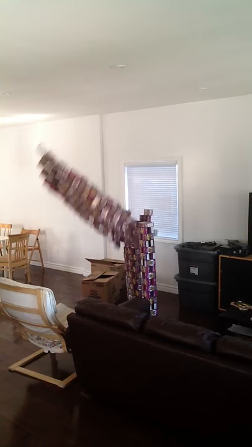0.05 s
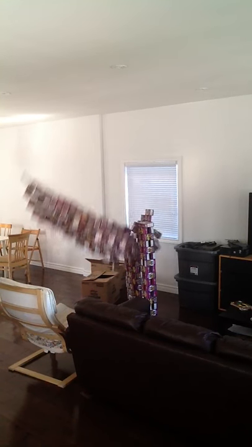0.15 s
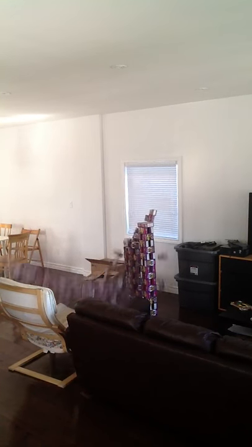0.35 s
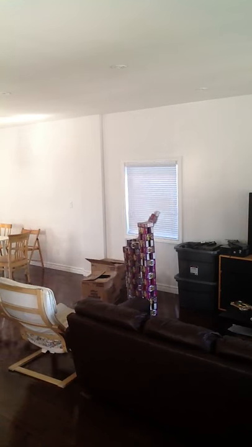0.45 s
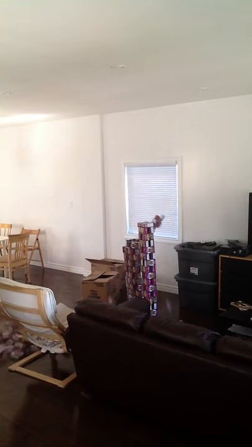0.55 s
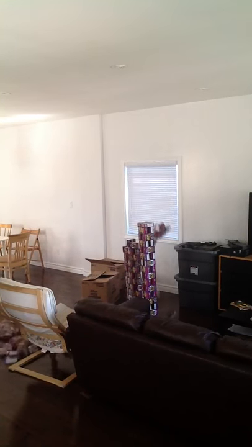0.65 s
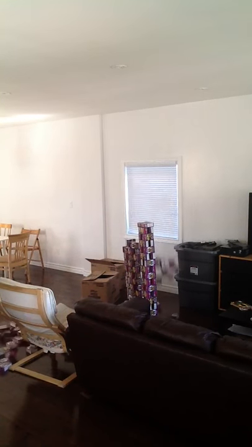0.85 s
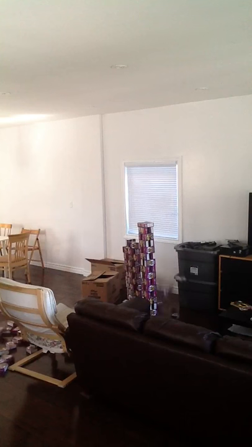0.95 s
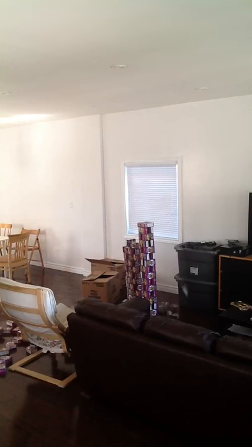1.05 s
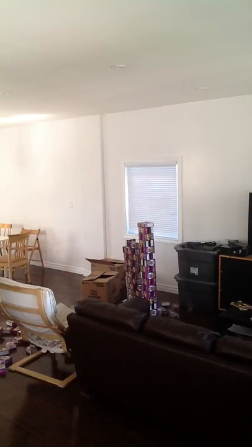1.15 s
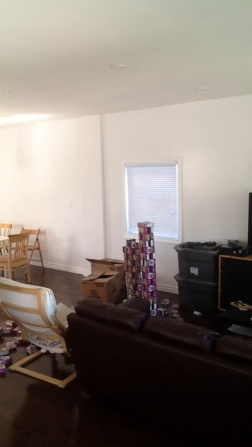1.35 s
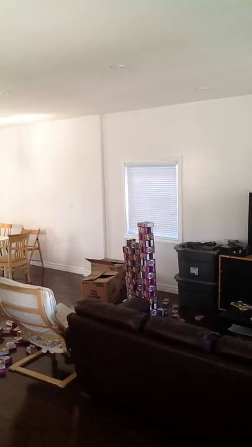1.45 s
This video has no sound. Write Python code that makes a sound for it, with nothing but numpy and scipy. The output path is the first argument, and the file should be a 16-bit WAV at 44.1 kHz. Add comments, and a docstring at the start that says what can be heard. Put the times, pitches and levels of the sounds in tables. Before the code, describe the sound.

Small cardboard boxes collapse in a bare living room, heard from a few metres off. They knock softly as the tower leans, hit the hard floor with sharp clicks and hollow knocks, and a few more tumble after.

```python
"""Living room, hard floor: a tall tower of small empty cardboard boxes, a few metres from a mono phone.
First the boxes slip and knock as the tower leans. At about 0.4 s the column crashes down and tumbles,
with corner clicks and faint floor thuds. Near 1 s a second batch drops and settles.
Each knock is a crack of card plus short panel tones, blurred by the bare room on its way to the mic."""
import sys
import numpy as np
from scipy import signal
from scipy.fft import rfft, irfft, next_fast_len
from scipy.io import wavfile

SR = 44100
rng = np.random.default_rng(int(sys.argv[2]) if len(sys.argv) > 2 else 0)


def unload_wav(signal):
    """Save mono or channel-first audio to the path in sys.argv[1] as 16-bit WAV at rate SR, clipped to [-1, 1]."""
    wavfile.write(
        sys.argv[1],
        SR,
        np.round(np.clip(np.atleast_2d(signal).T, -1, 1) * 32767).astype(np.int16),
    )


N = 66150
LEAD = 13230  # samples before time zero, so the boxes are already slipping at the start


def undb(db):
    """Decibels to gain."""
    return 10 ** (np.asarray(db) / 20)


def unit(x):
    """Scale to unit energy."""
    return x / np.sqrt(np.sum(x ** 2, axis=-1, keepdims=True) + 1e-18)


def fade(t, t60):
    """Exponential decay, 60 dB down after t60 seconds."""
    return np.exp(-np.log(1000) * t / t60)


def add(track, start_s, x):
    """Mix x in at start_s; the track begins LEAD samples before zero."""
    i = max(int(start_s * SR) + LEAD, 0)
    part = x[:max(len(track) - i, 0)]
    track[i:i + len(part)] += part


def colour(x, points):
    """Minimum-phase filter through (freq_hz, gain_db) points."""
    hz, db = np.array(points, float).T
    n = 2 * next_fast_len(x.shape[-1])
    bins_hz = np.arange(n // 2 + 1) * SR / n
    gain = undb(np.interp(np.log(bins_hz + 1), np.log(hz), db))
    cepstrum = irfft(np.log(gain))
    cepstrum[1:n // 2] *= 2
    cepstrum[n // 2 + 1:] = 0
    return irfft(rfft(x, n) * np.exp(rfft(cepstrum)))[..., :x.shape[-1]]


# Decay of the bare living room: band_hz, t60_s
ROOM_DECAY = [(150, 0.59), (500, 0.83), (1500, 0.79), (4000, 1), (8000, 0.81), (15000, 0.47)]
def room(x, wet_db=0, gap_s=0.0037, build_s=0.0031, early_span_s=.028, reflections=14, size=32768):
    """From one spot to the mic: direct sound, near reflections and a diffuse tail that dulls as it dies."""
    t, hz = np.arange(size) / SR, np.arange(size // 2 + 1) * SR / size
    bands_hz, t60s = np.array(ROOM_DECAY).T
    noise, tail = rfft(rng.standard_normal(size)), 0
    for band, t60_s in zip(np.eye(len(bands_hz)), t60s):
        band_gain = np.interp(np.log(hz + 1), np.log(bands_hz), band)
        tail = tail + irfft(noise * band_gain) * fade(t, t60_s)
    tail *= 1 - np.exp(-np.maximum(t - gap_s, 0) / build_s)
    early, strengths = np.zeros(size), rng.standard_normal(reflections)
    delays_s = gap_s + early_span_s * rng.random(reflections)
    early[(delays_s * SR).astype(int)] = strengths
    response = undb(wet_db) * (undb(3.5) * unit(tail) + undb(-2.5) * unit(early))
    response[0] += 1  # direct path
    return signal.fftconvolve(x, unit(response))[:len(x)]


# The floor under the heaviest blows: start_s, relative_level_db
FLOOR_THUDS = [(0.397, -39), (0.423, -39), (0.489, -39), (.54, -46), (.61, -49), (0.748, -42), (.987, -41),
               (1.075, -50), (1.161, -49)]
def floor_thuds(pitch_hz=86, t60_s=0.074, attack_s=.004, size=12000):
    """The floor gives a faint thump of three scattered low tones, heard across the room."""
    out, t = np.zeros(LEAD + N), np.arange(size) / SR
    envelope = fade(t, t60_s) * (1 - np.exp(-t / attack_s))
    for start_s, level_db in FLOOR_THUDS:
        tones_hz = pitch_hz * np.exp(0.28 * rng.standard_normal((3, 1)))
        thump = np.sin(2 * np.pi * tones_hz * t).sum(0)
        add(out, start_s, undb(level_db) * unit(thump * envelope))
    return room(out)


# Sharp corner strikes: start_s, relative_level_db
CORNER_SNAPS = [(0.401, -19), (0.429, -27), (0.466, -33), (0.99, -35)]
def corner_snaps(t60_s=0.0087, size=1024):
    """A stiff corner gives a short bright click that reaches the mic with less room on it."""
    out, t = np.zeros(LEAD + N), np.arange(size) / SR
    for start_s, level_db in CORNER_SNAPS:
        burst = rng.standard_normal(size) * fade(t, t60_s)
        click = colour(burst, [(500, -1), (2500, 5.5), (8500, 3), (14000, -15)])
        add(out, start_s, undb(level_db) * unit(click))
    return room(out, wet_db=-7)


# Panel modes of a typical box: pitch_hz, relative_level_db, t60_s
BOX_MODES = [(364.3, -9, 0.033), (485, -6, 0.072), (692.6, -1.5, 0.059), (933.7, 2, 0.05),
             (1299, 1.5, 0.036), (1607, -5.5, 0.087), (2156, -1, 0.02), (3090, -9.5, 0.0091)]
# Spectrum of the crack of card: freq_hz, gain_db
CRACK_SPECTRUM = [(40, -53), (80, -34), (130, -19), (190, -7), (330, -1.5), (1000, 2), (2400, 0.5),
                  (5000, -3), (8500, -8.5), (15000, -16)]
def knocks(count, size_spread=0.1585, crack_db=-1.5, crack_t60_s=0.015, size=2048):
    """Knocks of unit energy: a crack plus panel tones, pitched by the size of each box and weighted by where it
    is hit."""
    t = np.arange(size) / SR
    pitch_ratio = np.exp(size_spread * rng.standard_normal((count, 1)))
    panels = 0
    for pitch_hz, level_db, t60_s in BOX_MODES:
        detune, weight = rng.standard_normal((2, count, 1))
        tone = np.sin(2 * np.pi * pitch_hz * pitch_ratio * (1 + 0.054 * detune) * t)
        panels = panels + undb(level_db) * weight * unit(tone * fade(t, t60_s))
    crack = colour(rng.standard_normal((count, size)) * fade(t, crack_t60_s), CRACK_SPECTRUM)
    return unit(unit(panels) + undb(crack_db) * unit(crack))


def contact(x, bass_db, bite_db, treble_db):
    """Flat faces land with more bass, edges and corners with more bite and treble."""
    return colour(x, [(330, bass_db), (900, 0), (2800, bite_db), (11000, treble_db)])


# Runs of small knocks; a negative fade swells:
# start_s, length_s, level_db, fade_db, bass_db, bite_db, treble_db
KNOCK_SHOWERS = [(-.15, 0.26, -29, 11.5, 0.5, -5.5, -1), (0.073, 0.076, -33, 2, 8, -1.5, -2.5),
                 (0.17, 0.12, -26, 6, 1, -5.5, -3.5), (0.286, 0.098, -30.5, -15, 7, -2, -1.5),
                 (0.368, .028, -20.5, 1, 8, -6, -1), (.395, .033, -18.5, 4, 3.5, 8.5, 2.5),
                 (0.427, .05, -13, 1, -2.5, 2.5, 8), (.478, .095, -15.5, 8.5, -0.5, 0.5, 3.5),
                 (.57, .085, -21.5, 3, -6.5, -3, -5), (0.668, 0.16, -25.5, 7.5, 1.5, 0, 0),
                 (0.838, .1, -27, 3, 1.5, 1.5, -2), (.958, .03, -20.5, 12, -5, 2, 5),
                 (.987, 0.034, -20.5, 12, 2.5, 5, 3), (1.045, 0.062, -20.5, 24, 3, 0, -2),
                 (1.11, .15, -25.5, 12, -14, -7.5, -4), (1.269, .23, -43, 5, 2, -6, -2)]
def showers(count=36, spread_db=4.5, spot_count=9):
    """Boxes pile onto each other in uneven runs that mostly weaken; one track per spot on the floor."""
    spots = np.zeros((spot_count, LEAD + N))
    steps = np.tile(np.linspace(-2, 2, 6), (count // 6, 1))  # every six knocks span soft to hard
    for start_s, length_s, level_db, fade_db, *tone_db in KNOCK_SHOWERS:
        progress = (np.arange(count) + rng.random(count)) / count
        uneven_db = spread_db * rng.permuted(steps, axis=1).ravel()
        strength = undb(level_db) * np.sqrt(length_s * SR) * unit(undb(uneven_db - fade_db * progress))
        for k, knock in enumerate(contact(knocks(count), *tone_db)):
            add(spots[k % spot_count], start_s + progress[k] * length_s, strength[k] * knock)
    return spots


# Single boxes that stand out at the mic, each with a boom and a landing:
# start_s, relative_level_db, bass_db, bite_db, treble_db, boom_offset_db, boom_hz
BOX_LANDINGS = [(.002, -30, -11, -30, -3, -6.5, 239), (.076, -36, 6, -5, -10, 1.5, 247),
                (.170, -28.5, 7, -4, -16, 0, 367), (.191, -28, -1, 0.5, -13, -1.5, 282),
                (.26, -30, 1.5, -1, -3, -3, 243), (.3635, -20, -2.5, -5.5, -4, -2.5, 482.5),
                (.392, -22.5, -1, 3, -3, -2, 374), (.4235, -13, 3.5, -2, 3, -14, 325),
                (.436, -17.5, -17, 8.5, 3.5, -3, 354), (.499, -20.5, 5.5, 2.5, -7, -1, 325.6),
                (0.539, -18, 5, 5, 1, -15, 320), (.562, -15, 3, -0.5, 0, -14, 243),
                (0.603, -15.5, -17, -3, -2.5, -20, 250), (.751, -25.5, 7.5, 7, -8, -25, 245),
                (.786, -21.5, -6, -2, 1, -18.5, 227), (.905, -28, 8, -3, -3, -1.5, 245.3),
                (.987, -20, 7, -5.5, 3, -7, 244.7), (1.078, -19, 1, 1, -4, -7.5, 239.7),
                (1.161, -25, -14, -2.5, -14, -10, 252), (1.235, -33, 3.5, 0.5, -5, -12, 248),
                (1.325, -34.5, 0, -11, -3, -11.5, 242), (1.378, -41, -2, 3.5, 1, -2.5, 253)]
def hollow_booms(t60_s=0.29, attack_s=0.0042, size=15000):
    """The air inside a landing box swells into a short hollow note."""
    out, t = np.zeros(LEAD + N), np.arange(size) / SR
    envelope = fade(t, t60_s) * (1 - np.exp(-t / attack_s))
    for start_s, level_db, *_, boom_offset_db, boom_hz in BOX_LANDINGS:
        boom = np.sin(2 * np.pi * boom_hz * t) * envelope
        add(out, start_s, undb(level_db + boom_offset_db) * unit(boom))
    return out


def landings(count=4, rock_s=.004, edge_db=-5, rebound_db=-3, spot_count=9):
    """A box touches with an edge, slaps onto its face and skips on; one track per spot on the floor."""
    spots = np.zeros((spot_count, LEAD + N))
    strength = undb(np.r_[edge_db, rebound_db * np.arange(count - 1)])
    for start_s, level_db, *tone_db, _, _ in BOX_LANDINGS:
        gaps_s = rock_s * rng.uniform(.5, 1.5, count)
        places = rng.permutation(spot_count)
        for k, knock in enumerate(contact(knocks(count), *tone_db)):
            add(spots[places[k]], start_s + gaps_s[:k].sum(), undb(level_db) * strength[k] * knock)
    return spots


def scene(blow_db=29):
    """Each spot on the floor has its own path through the room to the mic; both channels are the same."""
    spots = showers() + undb(blow_db) * landings()
    heard = sum(room(spot) for spot in spots)
    heard += undb(blow_db) * (hollow_booms() + corner_snaps() + floor_thuds())
    return np.array([heard[LEAD:], heard[LEAD:]])


# Response of the phone microphone: freq_hz, gain_db
MIC_RESPONSE = [(25, -32), (42, -29), (65, -24.5), (95, -21.5), (130, -9.5), (190, 0), (260, -2), (700, -1),
                (1200, -1.5), (14000, -3)]
def record(dry, top_hz=15300):
    """The phone, a few metres off, rounds the highest peaks, thins the bass and cuts the top."""
    coloured = colour(np.tanh(dry), MIC_RESPONSE)
    lowpass = signal.ellip(12, .2, 80, top_hz, fs=SR, output="sos")
    return signal.sosfilt(lowpass, coloured)


dry = scene()
out = record(dry)
unload_wav(out)
```